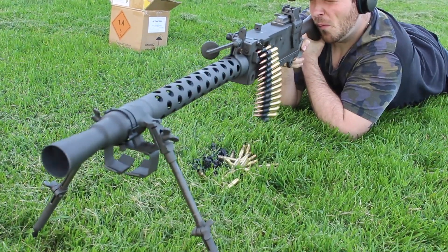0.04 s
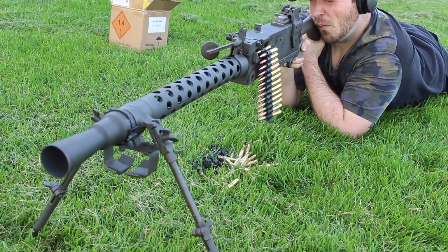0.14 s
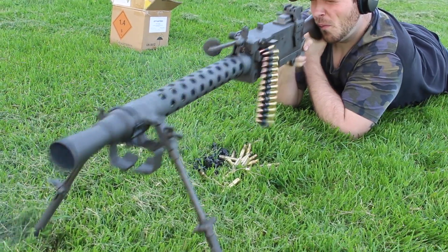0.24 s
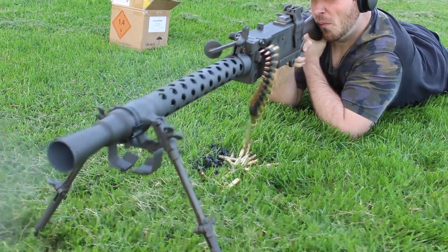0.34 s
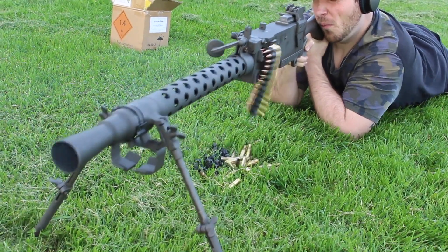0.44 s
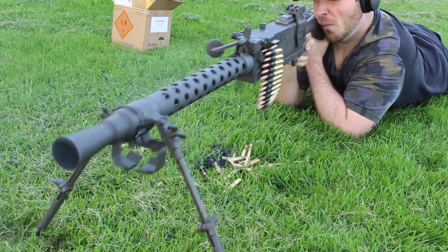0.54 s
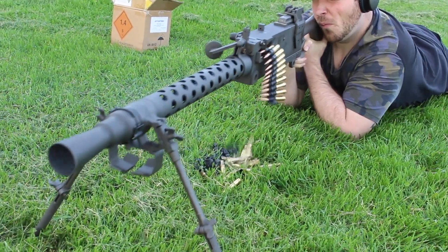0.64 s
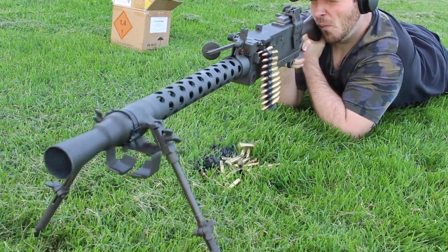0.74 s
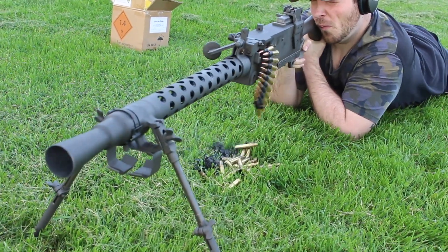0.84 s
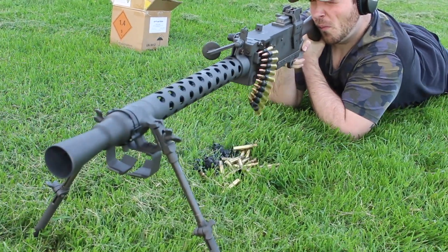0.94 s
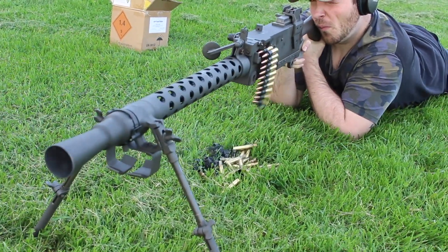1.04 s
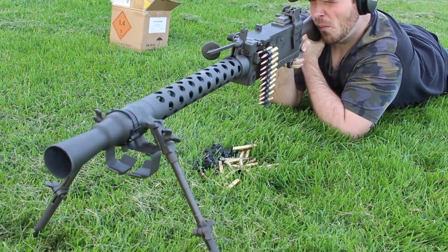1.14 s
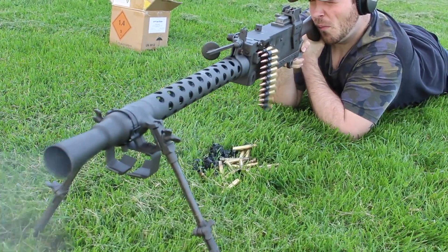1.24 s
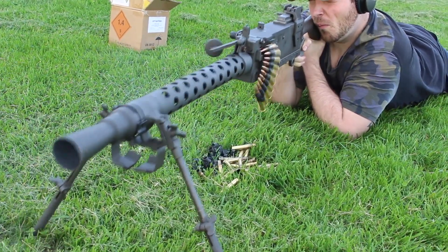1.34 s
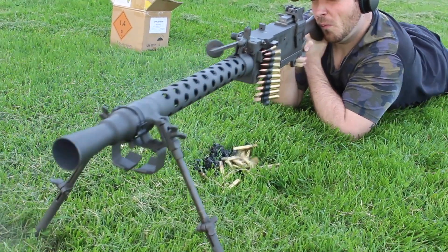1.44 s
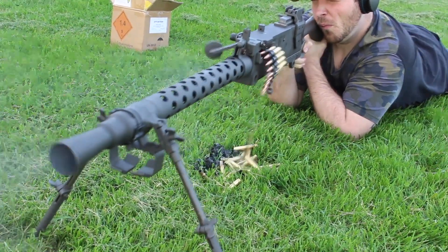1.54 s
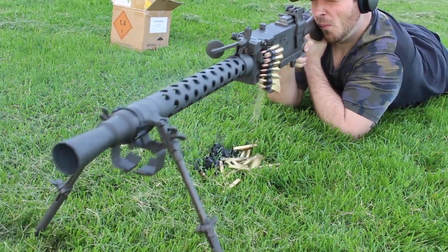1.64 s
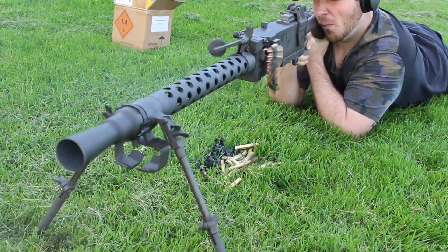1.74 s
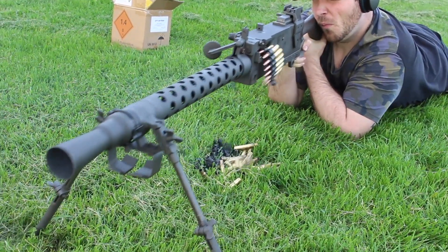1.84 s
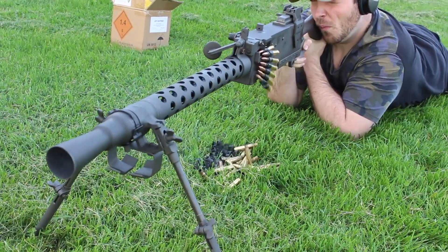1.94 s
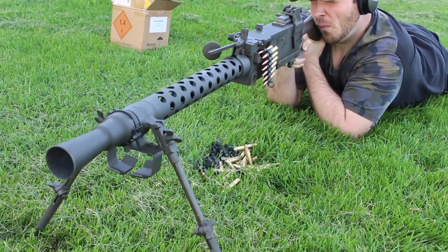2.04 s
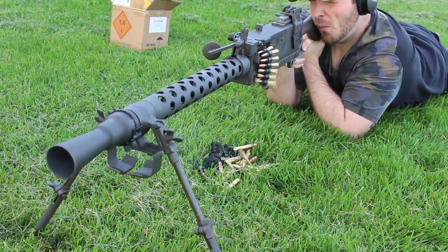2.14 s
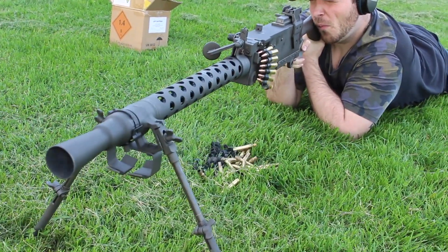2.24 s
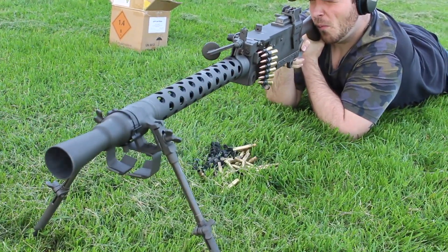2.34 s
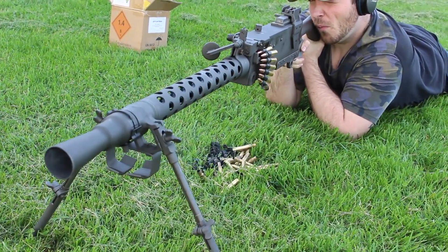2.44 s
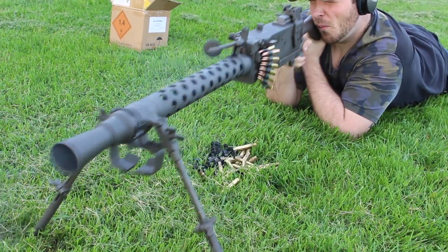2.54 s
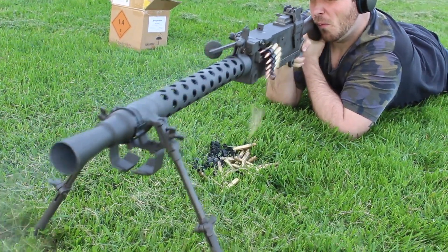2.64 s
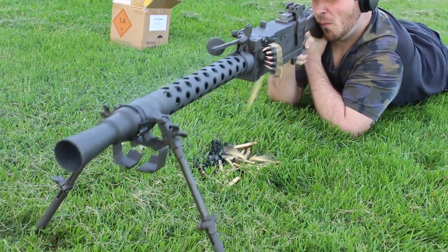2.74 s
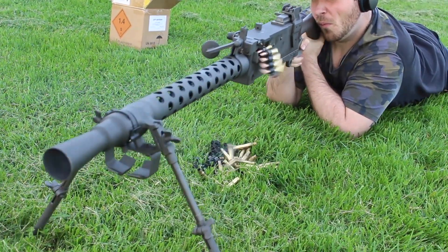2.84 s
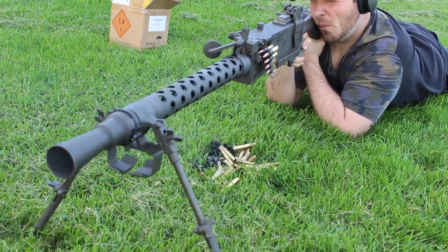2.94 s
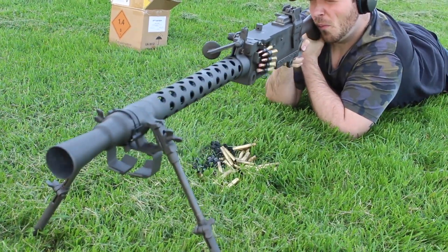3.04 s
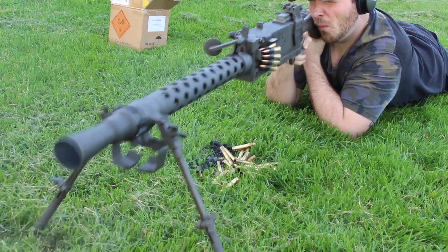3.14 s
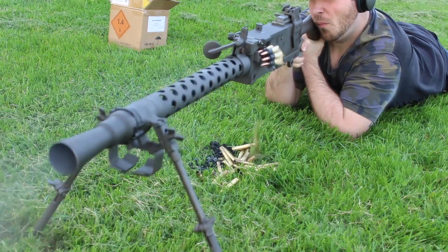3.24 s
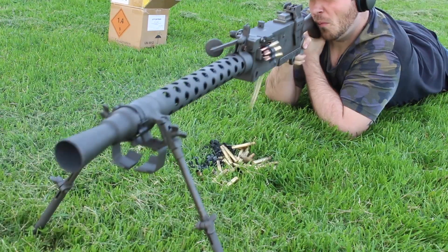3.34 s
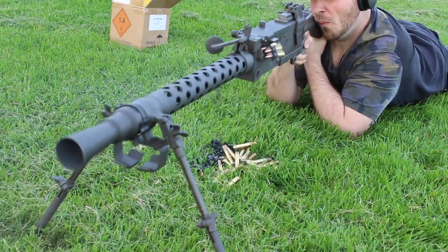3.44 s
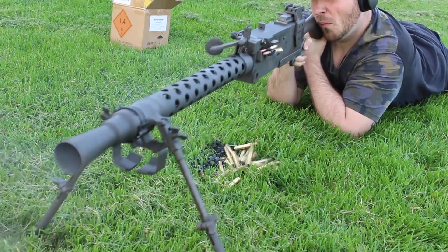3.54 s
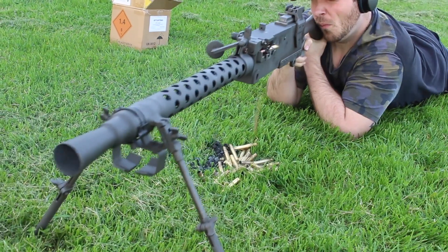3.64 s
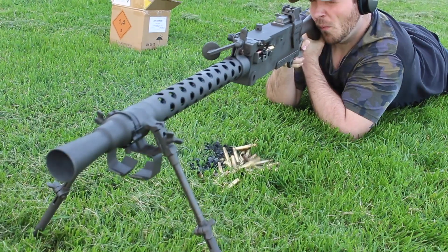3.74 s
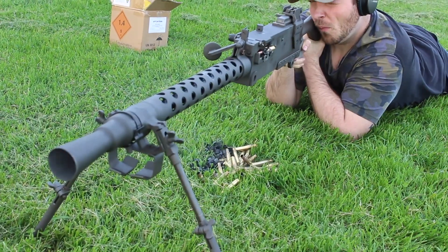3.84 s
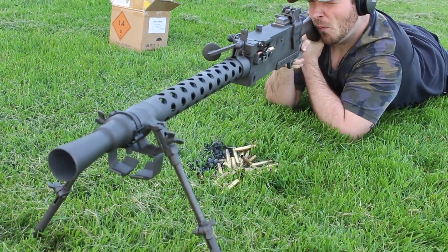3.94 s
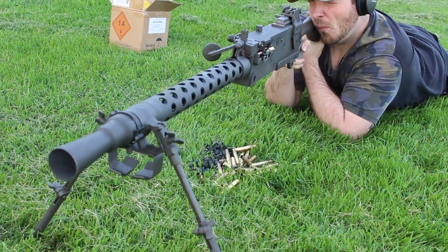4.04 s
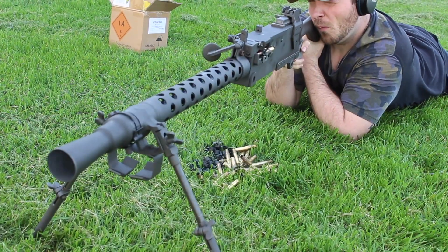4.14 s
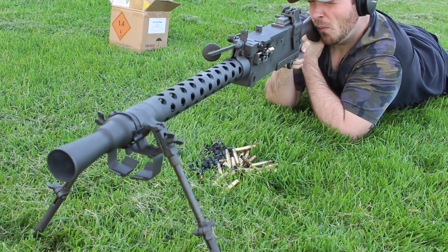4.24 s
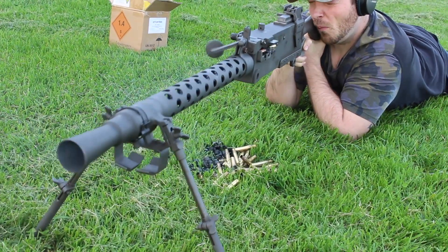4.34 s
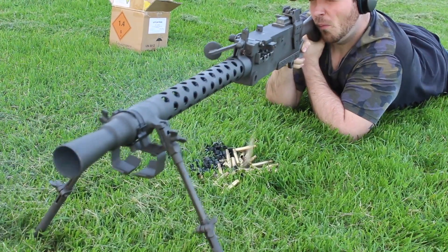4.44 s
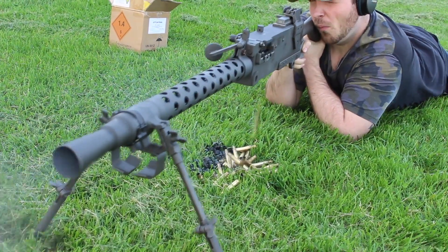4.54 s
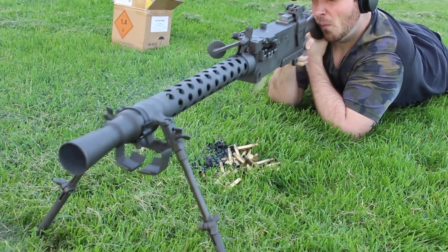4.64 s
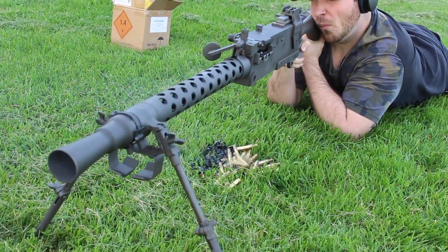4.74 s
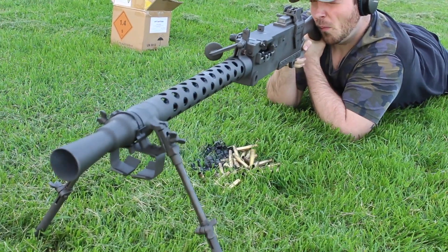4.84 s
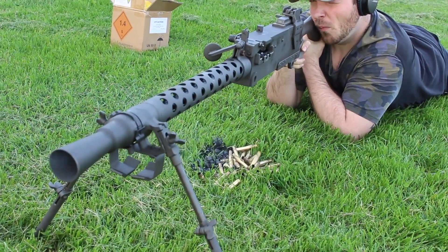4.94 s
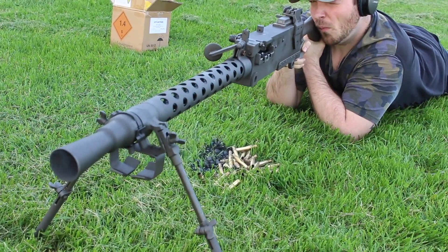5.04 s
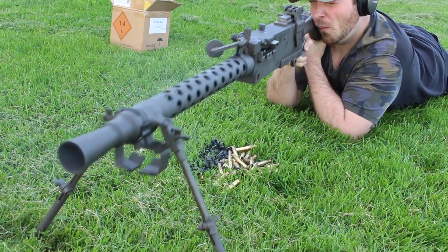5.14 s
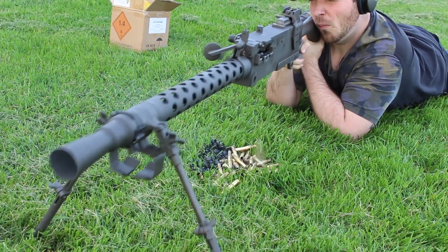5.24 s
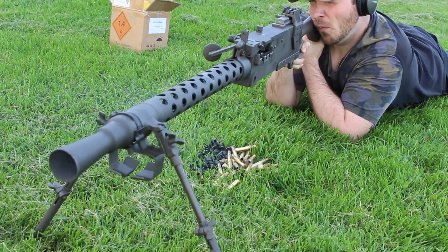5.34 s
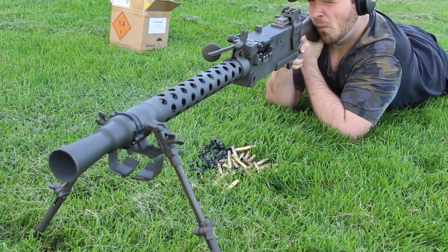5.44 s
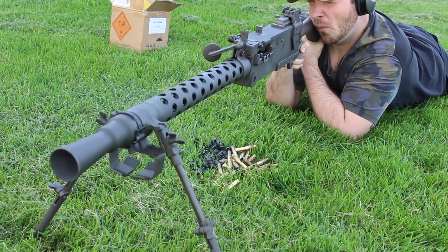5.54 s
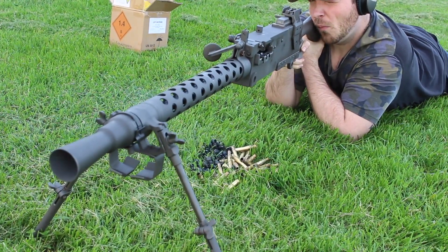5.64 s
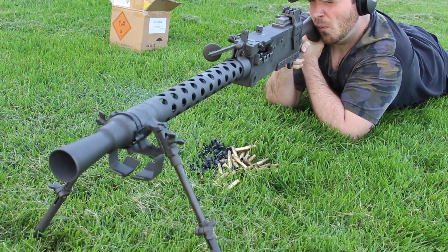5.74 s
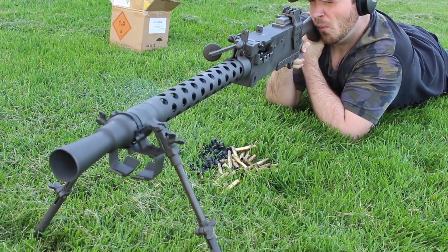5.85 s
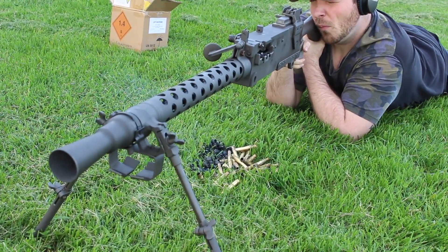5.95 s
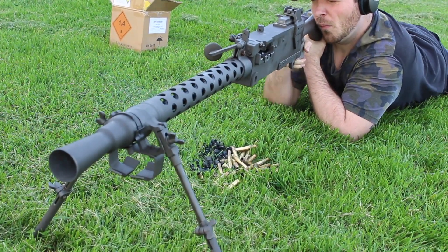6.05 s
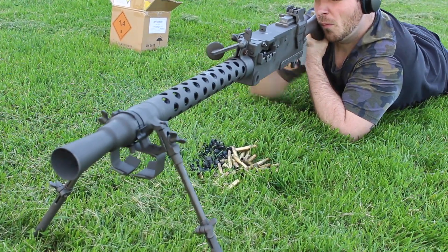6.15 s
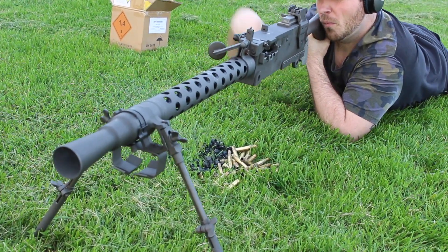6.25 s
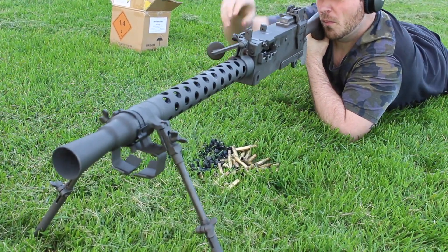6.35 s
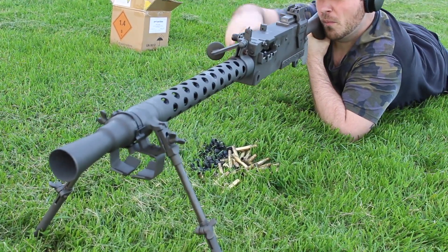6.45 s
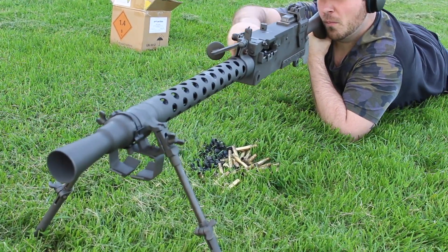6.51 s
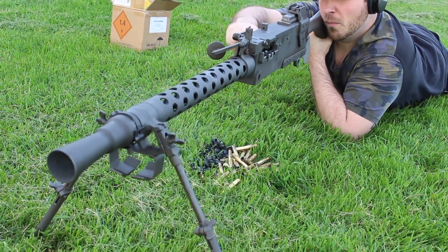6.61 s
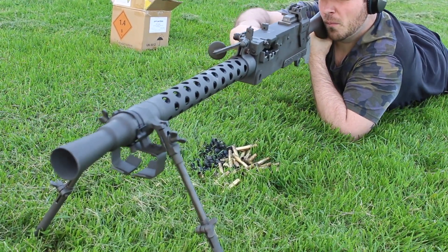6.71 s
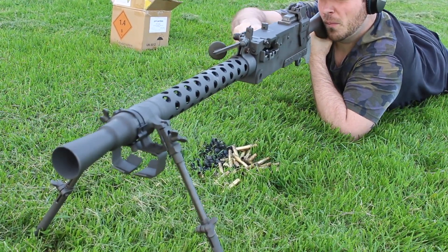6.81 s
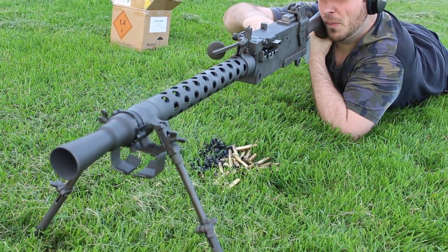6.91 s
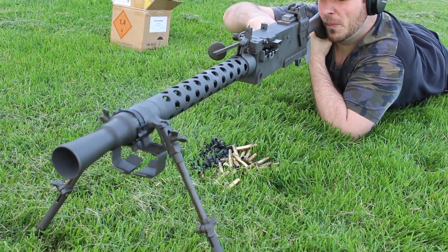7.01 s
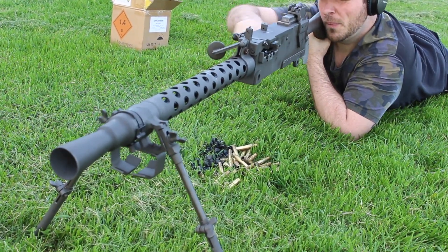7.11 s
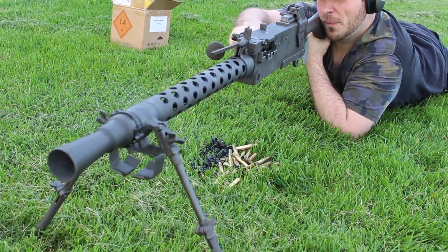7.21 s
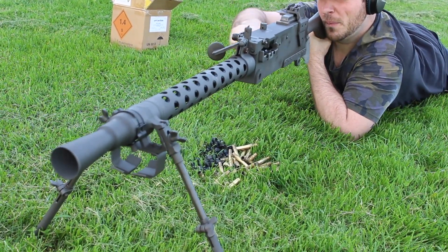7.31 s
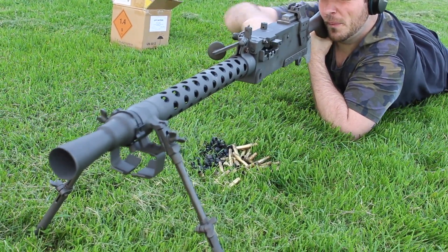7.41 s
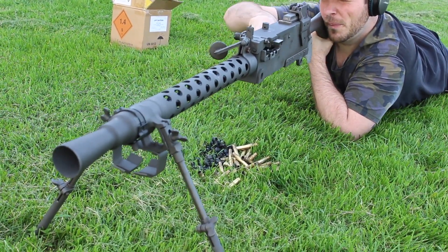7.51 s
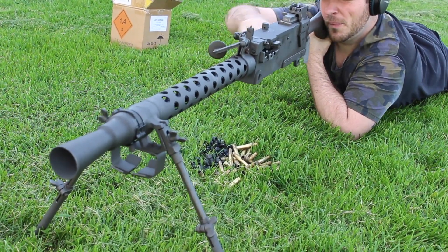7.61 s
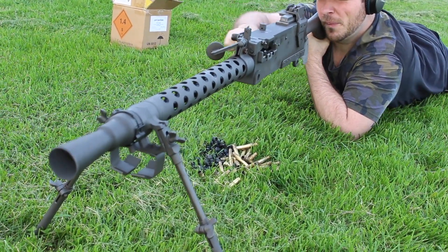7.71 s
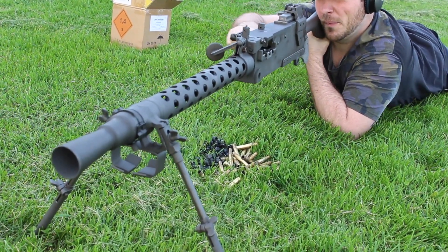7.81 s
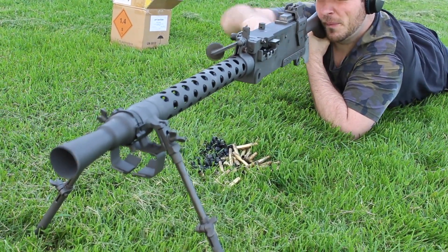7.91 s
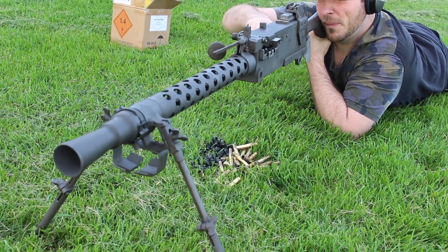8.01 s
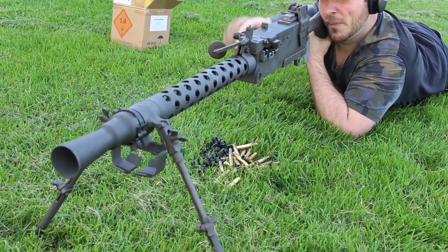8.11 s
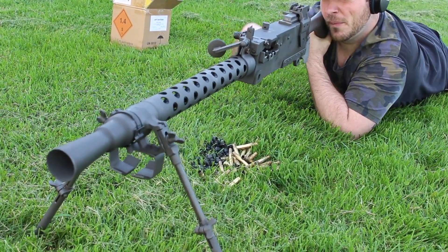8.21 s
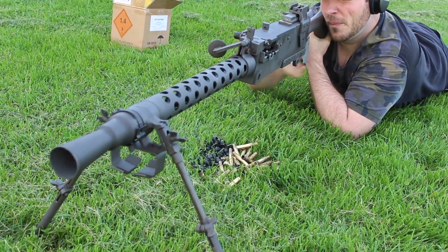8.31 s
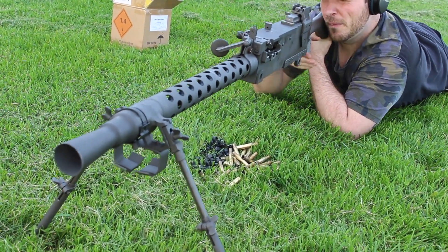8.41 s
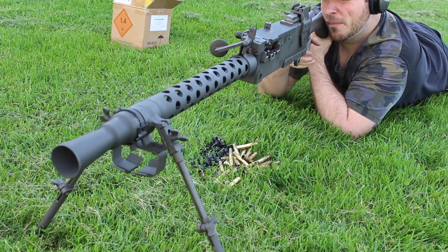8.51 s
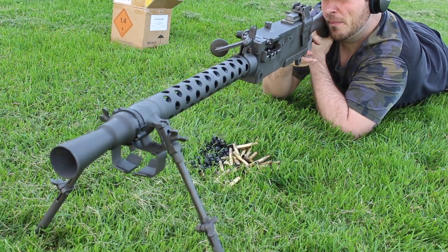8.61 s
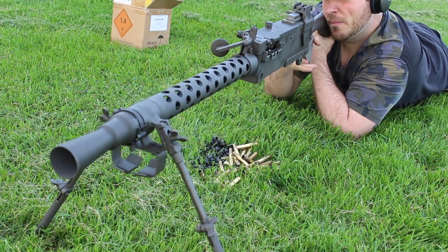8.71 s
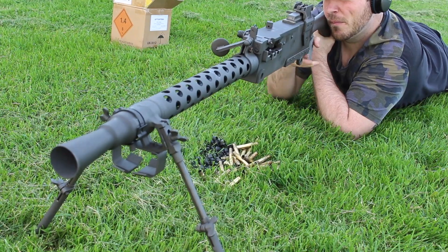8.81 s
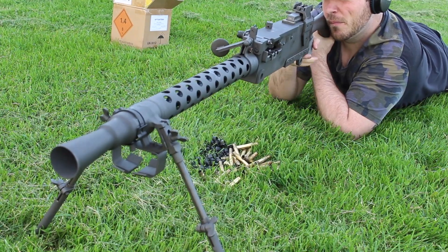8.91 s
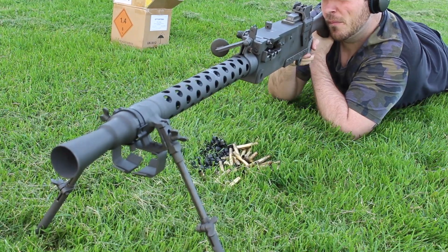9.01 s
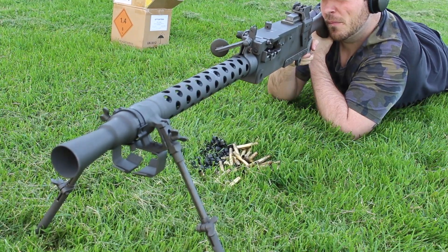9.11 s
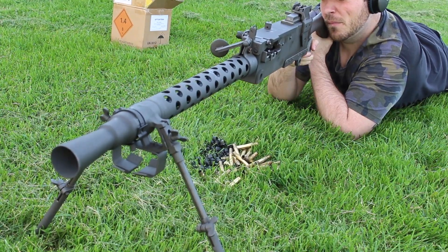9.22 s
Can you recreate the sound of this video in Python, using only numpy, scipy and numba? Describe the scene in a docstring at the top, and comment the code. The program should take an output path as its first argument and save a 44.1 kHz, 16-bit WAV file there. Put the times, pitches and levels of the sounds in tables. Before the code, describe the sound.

Loud, distorted machine gun bursts echo across a field with faint clinking cases, followed by metallic clacks of the bolt worked by hand.

```python
"""A belt-fed machine gun on a grassy range, close to a camera microphone. The echo of an earlier shot
dies away; then come five short bursts and a single round. Each blast overloads the microphone, nearby
objects and the far tree line answer, and a belt link and a case drop on the pile. The camera's gain
ducks after each blast and swells back, lifting the echoes and a light wind. Last, the bolt is racked
three times by hand and let fly."""
import sys
import numpy as np
from scipy import signal
from scipy.fft import rfft, irfft, next_fast_len
from scipy.io import wavfile
from scipy.ndimage import minimum_filter1d, map_coordinates
from numba import njit

SR = 44100
rng = np.random.default_rng(int(sys.argv[2]) if len(sys.argv) > 2 else 0)


def generate_wav(sig):
    """Save sig (samples, or channels by samples) to the path in sys.argv[1] as 16-bit PCM at SR."""
    pcm = np.round(np.clip(np.atleast_2d(sig).T, -1, 1) * 32767).astype(np.int16)
    wavfile.write(sys.argv[1], SR, pcm)


N = 408807

# Levels are relative, ahead of the camera's gain control.
# the breeze at the microphone: (time [s], level [dB])
WIND_LEVELS = [(0, -66.5), (6, -63.5), (6.45, -63), (6.6, -55.5), (6.85, -62), (7.5, -59), (8.3, -66.5),
               (8.6, -63), (9.27, -61.5)]
# spectra of wind, far echoes, near cracks, struck steel and muzzle gas: (frequency [Hz], level [dB])
WIND_COLOUR = [(20, -33), (50, 5), (110, 3), (260, -7), (450, -23.5), (1000, -25.5), (2500, -35),
               (5000, -54), (15000, -58)]
FAR_COLOUR = [(40, -9), (100, 7), (220, 11), (330, -1.5), (520, -15), (800, -4.5), (1200, -0.5),
              (2200, 0.5), (3300, 3), (4500, -6), (7000, -13.5), (10000, -4), (14000, -34)]
CRACK_COLOUR = [(100, 0.5), (900, 1.5), (1400, -12), (2200, -6.5), (3300, -1), (5000, -13), (8000, -23),
                (15000, -31.5)]
STEEL_COLOUR = [(240, -39), (400, -17), (607, -15), (719, -15.5), (979, -4), (1460, -5), (2430, -4.5),
                (3070, -2), (3690, -4.5), (3990, -5.5), (4580, -12.5), (11000, -23), (14600, -24),
                (16000, -53)]
MUZZLE_COLOUR = [(100, -4.5), (900, 2.5), (3500, 3.5), (6000, -6.5), (11000, -7.5), (16000, -21)]
# returns from the field, the tree line and the land beyond: (peak [s], level [dB], swell [dB/s], t60 [s])
FAR_RETURNS = [(.11, -30.5, 170, 1.0), (.25, -25, 240, .7), (.6, -54, 60, 3.2)]
# reflections from around the firing point:
# (delay [s], thud pitch [Hz], sharp at first by [octaves], thud level [dB], crack level [dB])
NEAR_RETURNS = [(.012, 198, 0, -12.5, 1), (.028, 420, 0, -25.5, -13), (.039, 166, 0, -9, -30),
                (.0398, 225, 1.05, 3, -11), (.054, 250, 0, -4, -12), (.0765, 225, 0, -4, -13),
                (.078, 950, 0, -1.5, -8.5), (.0845, 121, 0, -17, -22), (.097, 240, 0, -11.5, -34)]
# modes of a belt link, a case, the receiver box and the whole gun: (frequency [Hz], level [dB], t60 [s])
LINK_MODES = [(7940, -11.5, 0.34), (9800, 2.5, 0.26), (9950, -7, 0.23), (14220, -8.5, 0.28)]
CASE_MODES = [(5500, -13.5, 0.41), (7260, -6.5, 0.25), (7620, -7, 0.21), (12453, -2, 0.27),
              (13380, -22.5, .35), (14050, 8.5, 0.13)]
RECEIVER_MODES = [(1179, -20, .2), (1537, -10.5, 0.065), (2170, -4.5, 0.036), (3086, -0.5, 0.034),
                  (4013, -2.5, .04)]
GUN_MODES = [(1220, -32.5, .3), (1640, -30.5, 0.17), (2025, -8.5, 0.051), (2480, -37, 0.55),
             (3330, -6.5, 0.025), (3408, -48, 0.57), (3950, -7.5, 0.035), (4074, -29.5, 1.164),
             (6630, -63, .6), (8700, -64.5, 1.1), (9800, -55, .4)]
# knocks as the gun is handled; the last two are the bolt flying shut: (time [s], level [dB])
HANDLING_KNOCKS = [(6.26, -57.5), (6.532, -54), (6.749, -63.5), (6.893, -44), (6.906, -35), (8.505, -58),
                   (8.5725, -60.5), (9.2505, -38.5), (9.2537, -24)]
# the bolt racked by hand: (unlock [s], unlock level [dB], feed lever [s], feed lever level [dB],
# rear stop [s], push starts [s], home [s])
HAND_RACKS = [(6.884, -44, 6.9162, -24, 7.008, 7.1796, 7.258),
              (7.4542, -29.5, 7.476, -29.5, 7.5292, 7.694, 7.772),
              (7.9513, -32.5, 7.9735, -33, 8.0176, 8.189, 8.253)]
# each burst ends as the sear catches the bolt: (catch [s], catch level [dB], far echo level [dB],
# lasting ring level [dB], case flight [s], case level [dB])
BURST_ENDS = [(-.29, -15, 4, -3, .5, -85), (.752, -19, 4, 3.5, .489, -42), (1.915, -12, 2, 2.5, .449, -47),
              (2.891, -15, 2.5, -2, .412, -50), (3.765, -13, -2, -7, .45, -52),
              (4.802, -21, -.5, -2.5, .44, -62), (5.33, -12, -2.3, -5.5, .45, -80)]
# rounds fired, the first before the scene opens: (time [s])
SHOT_TIMES = [-.43, .3144, .4512, .5986, 1.3532, 1.4903, 1.6362, 1.7757, 2.6221, 2.7563, 3.2053, 3.3513,
              3.4851, 3.62, 4.3857, 4.5242, 4.6593, 5.2015]

BUFFER_S, CYCLE_S = .119, .133  # after a shot: the bolt strikes the buffer, the next round is due


def amp(db):
    return 10 ** (np.asarray(db) / 20)


def clock(seconds):
    """Sample times of a sound of this length."""
    return np.arange(int(seconds * SR)) / SR


def fade(t, t60):
    """A fall of 60 dB in t60 seconds."""
    return np.exp(-np.log(1000) * t / t60)


def add(track, s, sound):
    """Mix a sound into the track at time s."""
    start = round(s * SR)
    part = sound[max(-start, 0):max(len(track) - start, 0)]
    track[max(start, 0):][:len(part)] += part


def noise(colour, size):
    """Noise of rms 1, shaped by a spectrum (frequency [Hz], level [dB])."""
    padded = next_fast_len(size)
    hz, db = np.transpose(colour)
    gain = amp(np.interp(np.log(np.fft.rfftfreq(padded, 1 / SR) + 1), np.log(hz), db))
    shaped = irfft(rfft(rng.standard_normal(padded)) * gain, padded)[:size]
    return shaped / np.std(shaped)


def wander(t, rate_hz):
    """A line through random values, rate_hz of them a second."""
    return np.interp(t * rate_hz, np.arange(256), rng.standard_normal(256))


def ring(modes, t, detune=0.00023, waver_rad=.12, waver_hz=40):
    """Struck modes, at new strengths for every blow; loose contact makes their phase waver."""
    out = np.zeros(len(t))
    for (hz, db, t60), (strength, shift, turn) in zip(modes, rng.standard_normal((len(modes), 3))):
        age = t[:int(1.8 * t60 * SR)]
        phase = 2 * np.pi * (hz * (1 + detune * shift) * age + turn) + waver_rad * wander(age, waver_hz)
        out[:len(age)] += amp(db + 2 * strength) * fade(age, t60) * np.sin(phase)
    return out


def burst_of(s):
    """The row of the burst that the shot at time s belongs to."""
    return next(row for row in BURST_ENDS if row[0] > s)


def wind(gust_db=2.5, gust_hz=12, hiss_db=-97):
    """A light breeze rumbles on the microphone over a faint hiss."""
    t = np.arange(N) / SR
    gusts = map_coordinates(rng.standard_normal(int(t[-1] * gust_hz) + 4), [t * gust_hz])
    level_db = np.interp(t, *np.transpose(WIND_LEVELS)) + gust_db * gusts
    return amp(level_db) * noise(WIND_COLOUR, N) + amp(hiss_db) * rng.standard_normal(N)


def far_echoes(air_db_per_khz2_s=0.73, grain_db=2.5):
    """Distant, scattered returns swell and die; the air takes more treble the longer they travel."""
    t = clock(1.8)
    hz, delay, spectra = signal.stft(noise(FAR_COLOUR, len(t)), SR, nperseg=256)
    loss_db = air_db_per_khz2_s * np.outer((hz / 1000) ** 2, delay)
    patches_db = grain_db * rng.standard_normal(len(delay))
    tail = signal.istft(spectra * amp(patches_db - loss_db), SR, nperseg=256)[1][:len(t)]
    returns = [amp(db - swell * np.maximum(peak - t, 0)) * fade(np.maximum(t - peak, 0), t60)
               for peak, db, swell, t60 in FAR_RETURNS]
    return tail * np.linalg.norm(returns, axis=0)


def flutter_echo(start_hz=1100, fall_per_s=2.4, centre_s=0.044, width_s=.022, level_db=-24.5):
    """A row of evenly spaced reflectors returns a train of clicks whose pitch sinks."""
    t = clock(.1)
    click_hz = start_hz * np.exp(0.033 * rng.standard_normal() - fall_per_s * t)
    arrivals = np.flatnonzero(np.diff(np.floor(np.cumsum(click_hz) / SR)))
    clicks = np.bincount(arrivals, rng.rayleigh(size=len(arrivals)), len(t))
    train = signal.sosfilt(signal.butter(2, [2200, 3700], 'bandpass', fs=SR, output='sos'), clicks)
    swell = np.exp(-((t - centre_s) / width_s) ** 2)
    return amp(level_db) * train / np.std(train) * swell


def near_echoes(rise_s=0.0006, t60_cycles=12, sink_s=.005, crack_t60=.045):
    """Each surface near the gun returns a dull thud and a spray of cracks; one thud sinks in pitch."""
    out, t = np.zeros(SR // 4), clock(.1)
    onset = 1 - np.exp(-t / rise_s)
    for delay, hz, octaves, thud_db, crack_db in NEAR_RETURNS:
        turns = np.cumsum(hz * 2 ** (octaves * np.exp(-t / sink_s))) / SR
        thud = amp(thud_db) * onset * fade(t, t60_cycles / hz) * np.sin(2 * np.pi * turns)
        crack = amp(crack_db) * fade(t, crack_t60) * noise(CRACK_COLOUR, len(t))
        add(out, delay, thud + crack)
    return out


def spent_metal(link_flight_s=.158, link_db=-38.5, hop_s=0.068, link_hop_db=-3.5, case_hop_db=-10):
    """Every round drops a link and a case on the pile; each lands, hops twice and rings, never alike."""
    out, t = np.zeros(N), clock(.5)
    onset = 1 - np.exp(-t / 0.003)  # a soft landing
    for s in SHOT_TIMES:
        case_flight_s, case_db = burst_of(s)[4:]
        for hop in range(3):
            link_late, case_late = hop_s * (hop + min(hop, 1) * (rng.random(2) - .5))
            link = onset * ring(LINK_MODES, t, detune=0.018, waver_rad=1, waver_hz=160)
            case = onset * ring(CASE_MODES, t, detune=.01, waver_rad=0.9, waver_hz=130)
            tick = amp(-5) * fade(t, t60=.025) * rng.standard_normal(len(t))
            add(out, s + link_flight_s + link_late, amp(link_db + hop * link_hop_db) * link)
            add(out, s + case_flight_s + case_late, amp(case_db + hop * case_hop_db) * (case + tick))
    return out


def lasting_ring():
    """Once the bolt is caught, nothing damps the gun and its longest mode sings on."""
    out, longest = np.zeros(N), max(GUN_MODES, key=lambda mode: mode[2])
    for s, _, _, ring_db, *_ in BURST_ENDS:
        add(out, s, amp(ring_db) * ring([longest], clock(2)))
    return out


def bolt_strokes(cycle_db=-28, pull_db=-54, push_db=-56, margin_s=.028):
    """The bolt's travels (start [s], end [s], level [dB]): after each shot, to and fro in each rack."""
    out = [(s + BUFFER_S - margin_s / 2, s + CYCLE_S + margin_s / 2, cycle_db) for s in SHOT_TIMES]
    for unlock, *_, rear, push, home in HAND_RACKS:
        out.append((unlock - margin_s, rear + margin_s, pull_db))
        out.append((push - margin_s, home + margin_s, push_db))
    return out


def bolt_scrapes(catch_db=4.5, catch_hz=350):
    """Steel scrapes over steel in tiny catches, swelling and fading with the stroke."""
    out = np.zeros(N)
    for start, end, db in bolt_strokes():
        t = clock(end - start)
        friction = amp(db + catch_db * wander(t, catch_hz)) * np.hanning(len(t))
        add(out, start, friction * noise(STEEL_COLOUR, len(t)))
    return out


def chatter(start, end, level_db, spacing_s=.015, scatter=.2, spread_db=2.5):
    """Light, uneven contacts of the travelling bolt (time [s], level [dB])."""
    times = np.arange(start + spacing_s, end, spacing_s)
    return [(s + scatter * spacing_s * late, level_db + spread_db * force)
            for s, (late, force) in zip(times, rng.standard_normal((32, 2)))]


def hard_stop(s, db, build_db, rebound_db, count, spacing_s=.0078):
    """The bolt meets a stop (time [s], level [dB]): ever harder blows, a rebound, the handle settling."""
    run_in = [(s - k * spacing_s, db - k * build_db) for k in range(count)]
    rebound, settle = (s + .019, db + rebound_db), (s + .08, -54)
    return run_in + [rebound, settle]


def steel_contacts(buffer_db=-20, push_db=-39):
    """All blows of steel on steel (time [s], level [dB]): handling, buffer, sear and hand racks."""
    out = list(HANDLING_KNOCKS)
    out += [(s + BUFFER_S, buffer_db) for s in SHOT_TIMES]
    out += [(s, db) for s, db, *_ in BURST_ENDS]
    for unlock, unlock_db, feed, feed_db, rear, push, home in HAND_RACKS:
        out += [(unlock, unlock_db), (feed, feed_db), (push, push_db)]
        out += chatter(unlock, rear, level_db=-43, spacing_s=.018)
        out += hard_stop(rear, db=-21, build_db=17, rebound_db=-17, count=2, spacing_s=.009)
        out += chatter(push, home, level_db=-54)
        out += hard_stop(home, db=-22.5, build_db=5.5, rebound_db=-5, count=4)
    return out


def action_clanks(clank_db=1.0, rattle_db=-27, receiver_db=-5, ring_db=-10.5, dull_below_db=-48):
    """Close up, each contact is a crack, a rattle of loose parts, a receiver clank and the gun's ring."""
    out, t, ring_t = np.zeros(N), clock(.3), clock(2)
    onset = 1 - np.exp(-t / 0.00069)
    crack_and_rattle = fade(t, t60=0.026) + amp(rattle_db) * fade(t, t60=0.15)
    for s, db in steel_contacts():
        clatter = noise(STEEL_COLOUR, len(t)) * crack_and_rattle
        receiver = amp(receiver_db) * ring(RECEIVER_MODES, t, detune=.015)
        clank = onset * (clatter + receiver)
        if db < dull_below_db:  # a light touch sounds duller
            clank = signal.sosfilt(signal.butter(2, 4200, fs=SR, output='sos'), clank)
        add(out, s, amp(db + clank_db) * clank)
        add(out, s, amp(db + ring_db) * ring(GUN_MODES, ring_t))
    return out


def muzzle_blast(shock_db=32, shock_s=0.0011, gas_db=21, gas_s=0.0046, suction_db=10, suction_s=0.02):
    """A shock swing, a few milliseconds of roaring, spitting gas, then the suction behind the wave."""
    t = clock(.03)
    shock_hz = 620 * np.exp(.15 * rng.standard_normal())
    shock = -amp(shock_db) * np.exp(-t / shock_s) * np.sin(2 * np.pi * shock_hz * t)
    gas = amp(gas_db) * np.exp(-(t / gas_s) ** 2) * noise(MUZZLE_COLOUR, len(t))
    trough = np.sin(np.pi * np.minimum(t / suction_s, 1)) ** 2
    spit = amp(9) * rng.exponential(size=len(t)) * (rng.random(len(t)) < .02)  # sparse spikes
    return shock + gas + trough * (spit - amp(suction_db))


def gunfire(lock_db=-36, lock_lead_s=0.0031, ring_db=-4, flutter_delay_s=.205):
    """Close to the microphone the bolt locks, the round fires and the gun rings; the range answers."""
    out, t = np.zeros(N), clock(2)
    for s in SHOT_TIMES:
        echo_db = burst_of(s)[2]
        add(out, s - lock_lead_s, amp(lock_db) * noise(CRACK_COLOUR, SR // 200))
        add(out, s, muzzle_blast())
        add(out, s, amp(ring_db) * ring(GUN_MODES, t))
        add(out, s, near_echoes())
        add(out, s, amp(echo_db) * far_echoes())
        add(out, s + flutter_delay_s, amp(echo_db) * flutter_echo())
    return out


def scene():
    """Gun, range and wind at one microphone by the firing point."""
    return (gunfire() + lasting_ring() + action_clanks() + bolt_scrapes() + spent_metal() + wind())[None]


@njit
def follow(level, attack_s, release_s, state):
    """The gain control's detector charges quickly and drains slowly."""
    attack, release = attack_s * SR, release_s * SR
    out = np.empty(len(level))
    for i in range(len(level)):
        state += (level[i] - state) / attack if level[i] > state else -state / release
        out[i] = state
    return out


def record(dry, coupling_hz=35, attack_s=0.0039, hold_s=.02, target=0.41, knee=0.0071, top_hz=16000):
    """The camera's input clips, its coupling capacitor sags, the gain ducks, the converter clips again."""
    railed = np.clip(dry[0], -1, 1)
    coupled = signal.lfilter(*signal.butter(1, coupling_hz, 'highpass', fs=SR), railed)
    level = np.abs(railed)
    quick = follow(level, attack_s, release_s=.12, state=0.0)
    slow = follow(level, attack_s, release_s=.19, state=0.079)  # still charged by the earlier shot
    envelope = (quick + slow) / 2
    reach = int(hold_s * SR / 2)
    held_peak = -minimum_filter1d(-envelope, size=2 * reach + 1, origin=reach)
    converted = np.clip(coupled * target / (knee + held_peak), -1, 1)
    return signal.sosfiltfilt(signal.butter(24, top_hz, fs=SR, output='sos'), converted)[None]


dry = scene()
out = record(dry)
generate_wav(out)
```